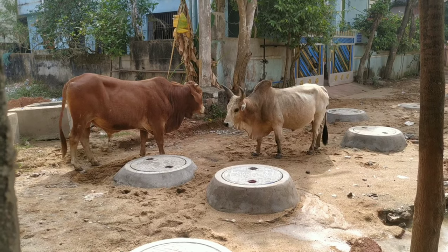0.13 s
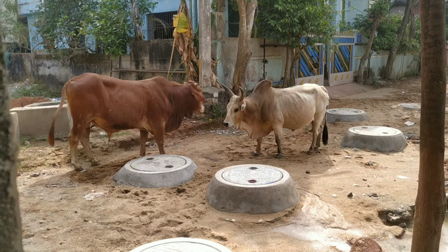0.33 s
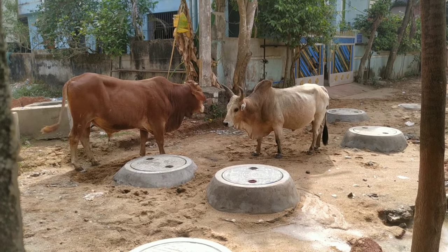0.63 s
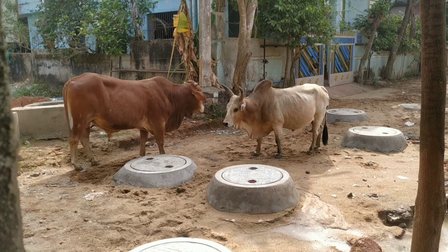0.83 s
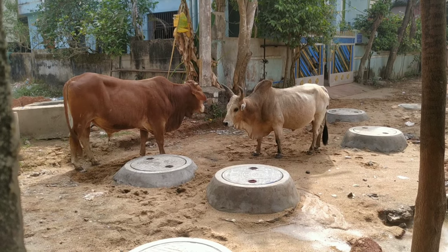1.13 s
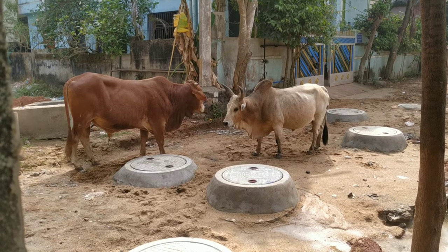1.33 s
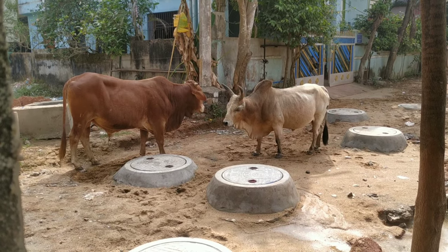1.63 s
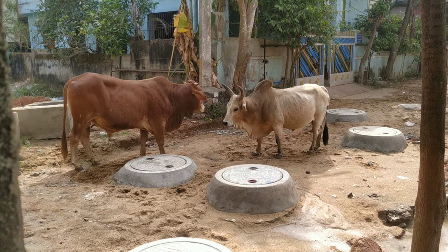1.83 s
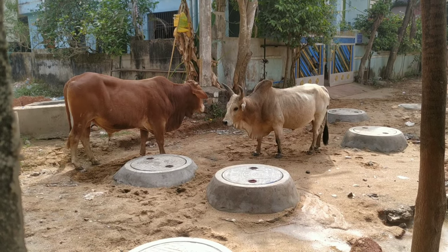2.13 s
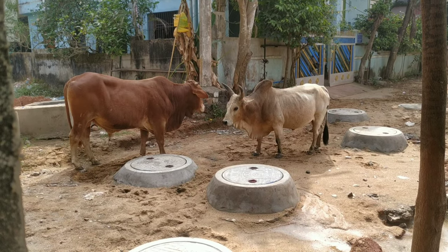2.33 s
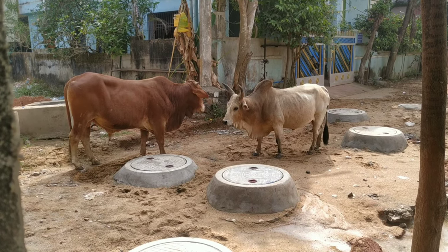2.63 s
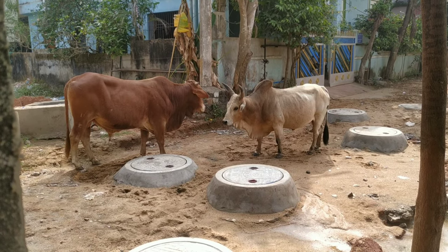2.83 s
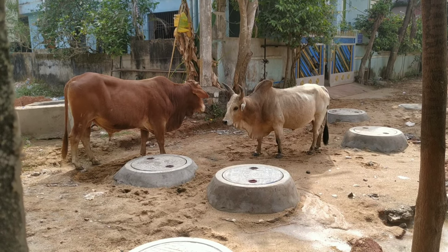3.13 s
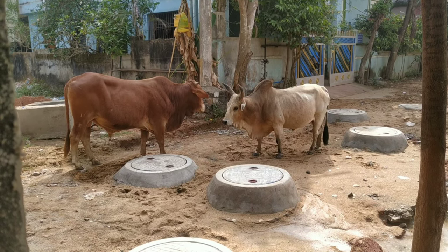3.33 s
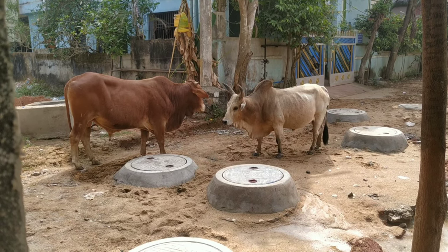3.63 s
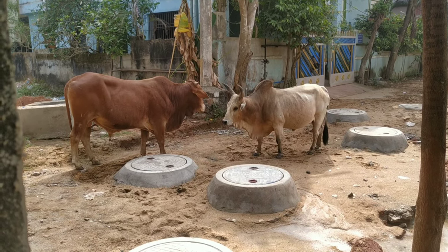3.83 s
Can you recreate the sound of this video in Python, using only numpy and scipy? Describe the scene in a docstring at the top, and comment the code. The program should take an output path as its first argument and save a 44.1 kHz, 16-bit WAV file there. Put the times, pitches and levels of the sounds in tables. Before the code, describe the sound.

A bull's loud, bright bellow cuts off, then after a quiet gap a moan swells into a roar.

```python
"""A bull's bright, open-mouthed bellow breaks off as one bird chirps four times and another gives a falling note.
The gap leaves low outdoor rumble with far birds, a soft knock and faint dry scuffs and ticks.
Then a low moan rises and opens into a roar. Bellows: fold pulses and rasp through throat resonances.
Birds: gliding sines. Knock: a short sine. Air, scuffs and far birds: filtered noise."""
import sys
import numpy as np
from scipy import signal
from scipy.fft import rfft, irfft
from scipy.io import wavfile
from scipy.ndimage import uniform_filter1d

SR = 44100
rng = np.random.default_rng(int(sys.argv[2]) if len(sys.argv) > 2 else 0)


def transcribe(u):
    """Save the signal u as a 16-bit wav file named by the first command-line argument.

    u: samples, shape (n,) or (channels, n), limited to [-1, 1]; the rate is SR.
    q: integer samples, one column per channel.
    """
    v = np.clip(np.atleast_2d(u).T, -1, 1)
    q = np.round(v * 32767).astype(np.int16)
    wavfile.write(sys.argv[1], SR, q)


N = 176400
TIME = np.arange(N) / SR
PADDED = 2 ** 18
FREQS = np.maximum(np.arange(PADDED // 2 + 1) * SR / PADDED, 1)


def from_db(db):
    """Decibels to gain."""
    return 10 ** (np.asarray(db) / 20)


def rms_one(x):
    """Scale to unit power."""
    return x / np.sqrt(np.mean(x ** 2) + 1e-20)


def in_time(rows, start_s=0):
    """Each column of a curve, interpolated at every sample."""
    s, *columns = np.transpose(rows)
    return [np.interp(TIME - start_s, s, column) for column in columns]


def over_hz(points):
    """A table joined by straight lines over log frequency."""
    hz, value = np.transpose(points)
    return np.interp(np.log(FREQS), np.log(hz), value)


def filtered(x, response):
    """Apply a frequency response."""
    return irfft(rfft(x, PADDED) * response)[..., :N]


def bell(hz, log_width):
    """Gaussian band over log frequency."""
    return np.exp(-(np.log(FREQS / hz) / log_width) ** 2)


def flutter(hz):
    """Random motion up to a given rate, spread 1."""
    return rms_one(filtered(rng.standard_normal(N), 1 / (1 + (FREQS / hz) ** 2)))


def gate(rows, attack_s, release_s, start_s=0):
    """Open for the length of a curve, with exponential flanks."""
    early_s = start_s + rows[0][0] - TIME
    late_s = TIME - start_s - rows[-1][0]
    decay = np.maximum(early_s, 0) / attack_s + np.maximum(late_s, 0) / release_s
    return np.exp(-np.minimum(decay, 20))


def diffuse_tail(envelope):
    """Response of a unit-energy noise tail with a given envelope."""
    tail = rng.standard_normal(SR) * envelope
    return rfft(tail / np.sqrt(np.sum(tail ** 2)), PADDED)


# left-right likeness of noise: [f/Hz, likeness 0-1]
LIKENESS = [(300, .97), (9000, .4)]


def stereo_noise(spectrum):
    """Coloured noise, alike in both ears in the bass and less so in the treble."""
    alike = np.clip(over_hz(LIKENESS), 0, 1)
    split = np.sqrt([1 + alike, 1 - alike])
    mid, side = filtered(rng.standard_normal((2, N)), from_db(over_hz(spectrum)) * split)
    return rms_one(np.array([mid + side, mid - side]))


# outdoor air spectrum: [f/Hz, relative density/dB per Hz]
AIR_SPECTRUM = [(25, -1.5), (150, -9), (350, -23.5), (480, -20.5), (1500, -29), (3400, -29.5), (5000, -35),
                (6700, -27.5), (15500, -39)]
AIR_DB = -45.5
FAR_BIRD_HZ, FAR_BIRD_DB, FAR_BIRD_LOG_WIDTH = 3350, -68.5, .05


def air():
    """Steady low rumble under faint hiss; far birds as narrow-band noise, a thin wavering tone."""
    twitter = filtered(rng.standard_normal(N), bell(FAR_BIRD_HZ, FAR_BIRD_LOG_WIDTH)) * flutter(10)
    return from_db(AIR_DB) * stereo_noise(AIR_SPECTRUM) + from_db(FAR_BIRD_DB) * rms_one(twitter)


KNOCK_S, KNOCK_HZ, KNOCK_DB, KNOCK_DECAY_S = 1.7, 460, -51, .022


def knock():
    """One soft, hollow knock far off: a sine that swells and dies symmetrically."""
    envelope = np.exp(-np.abs(TIME - KNOCK_S) / KNOCK_DECAY_S)
    return from_db(KNOCK_DB) * np.sin(2 * np.pi * KNOCK_HZ * TIME) * envelope


# dry scuffs and ticks: [t/s, level/dB]
SCUFFS = [(1.02, -49), (1.179, -42), (1.519, -43), (2.405, -43.5), (2.849, -42)]
# scuff spectrum: [f/Hz, relative level/dB]
SCUFF_SPECTRUM = [(1000, -23), (2500, -6), (9000, -3.5), (15500, -6.5)]
SCUFF_ATTACK_S, SCUFF_DECAY_S, GRIT_DB = 0.037, 0.1, 1.5


def scuffs():
    """Short gritty swells of dry noise."""
    level = np.zeros(N)
    for s, db in SCUFFS:
        attack = np.clip((TIME - s) / SCUFF_ATTACK_S + .5, 0, 1)
        decay = np.exp(-np.maximum(TIME - s, 0) / SCUFF_DECAY_S)
        level += from_db(db) * attack * decay
    return level * rms_one(stereo_noise(SCUFF_SPECTRUM) * from_db(GRIT_DB * flutter(200)))


def whistle(shape, start_s=0):
    """A bird's nearly pure gliding tone."""
    hz, db = in_time(shape, start_s)
    tone = np.sin(2 * np.pi * np.cumsum(hz) / SR)
    return from_db(db) * tone * gate(shape, .002, 0.0019, start_s)


# chirp peaks: [t/s, relative level/dB]
CHIRPS = [(.045, -5.5), (.199, -5), (0.354, -2), (.511, -4)]
# one chirp, soft arch then loud upward sweep: [t from peak/s, f/Hz, relative level/dB]
CHIRP = [(-.072, 1560, -15), (-.051, 1870, -2), (-.036, 1560, -24), (-.024, 1600, -20), (-.012, 1980, -4),
         (0, 2530, 1), (.018, 2480, -7)]
# the other bird's falling note: [t/s, f/Hz, level before warble/dB]
FALLING_NOTE = [(.63, 3780, -21.5), (.662, 3423, -15), (.694, 3193, -15), (.725, 3380, -28.5)]
WARBLE_HZ, WARBLE_DEPTH = 60.2, 0.92
ECHO_S, ECHO_DB = 0.029, -11


def birds():
    """Four chirps and a fall warbling in level, thrown back by a wall."""
    song = sum(from_db(db) * whistle(CHIRP, s) for s, db in CHIRPS)
    warble = np.cos(2 * np.pi * WARBLE_HZ * (TIME - FALLING_NOTE[1][0]))
    song = song + whistle(FALLING_NOTE) * (1 + WARBLE_DEPTH * warble)
    return song + from_db(ECHO_DB) * np.interp(TIME - ECHO_S, TIME, song, left=0)


YARD_T60_S, BIRD_YARD_DB, BULL_YARD_DB = 1, -32.5, -23


def yard(x):
    """A weak diffuse tail from walls and trees: noise falling 60 dB per T60."""
    return filtered(x, diffuse_tail(from_db(-60 * TIME[:SR] / YARD_T60_S)))


TREBLE_HZ = 1700


def treble(x):
    """The upper part of a sound."""
    return filtered(x, 1 / (1 + (TREBLE_HZ / FREQS) ** 6))


RESONANCE_LOG_WIDTH = 0.13


def swell(x, hz, db):
    """Raise or lower one resonance of the voice by a level that moves in time."""
    return x + filtered(x, bell(hz, RESONANCE_LOG_WIDTH)) * (from_db(db) - 1)


# resonances that ring on between pulses: [f/Hz]
RINGING_HZ = [650, 1000, 2200, 2750]
RINGING_WIDTH_HZ = 200
SCATTER_S, SCATTER_DB = 0.0075, 6


def ring_on(x):
    """Resonances hold their partials back (all-pass); nearby surfaces scatter the treble."""
    lag = 1
    for hz in RINGING_HZ:
        detuning = hz ** 2 - FREQS ** 2
        damping = 1j * FREQS * RINGING_WIDTH_HZ
        lag = lag * (detuning - damping) / (detuning + damping)
    share = from_db(SCATTER_DB) / (1 + (TREBLE_HZ / FREQS) ** 4)
    scatter = 1 + share * diffuse_tail(np.exp(-TIME[:SR] / SCATTER_S))
    return filtered(x, lag * scatter / np.sqrt(1 + share ** 2))


WANDER, WANDER_HZ = .18, 7


def wander(x):
    """A scattered copy comes and goes, so partials rise and fall by differing amounts."""
    scattered = filtered(x, diffuse_tail(np.exp(-TIME[:SR] / SCATTER_S)))
    return x + WANDER * flutter(WANDER_HZ) * scattered


JITTER_CYCLES, SHIMMER, RASP, RASP_DULLING = .025, .55, 1.15, .55  # all scale with roughness but dulling
HISS_DB = -18


def folds(curve, roughness):
    """Vocal-fold pulses, uneven when hoarse, with a puff of rasp in every cycle."""
    hz, rough = in_time(curve)[0], in_time(roughness)[0]
    cycle = (np.cumsum(hz) / SR + JITTER_CYCLES * rough * flutter(60)) % 1 - .5
    offset = cycle * SR / hz  # samples from the pulse
    pulses = rms_one(np.sinc(offset / 2) * np.exp(-(offset / 10) ** 2))
    pulses = pulses * (1 + SHIMMER * rough * flutter(70))
    rasp = rms_one(rng.standard_normal(N) * np.exp(-2 * (cycle % 1)))
    bright = treble(rasp)
    breath = RASP * rough * (rasp - RASP_DULLING * bright) + from_db(HISS_DB) * bright
    return wander(ring_on(pulses + breath))


def throat(shape, top_hz):
    """Causal minimum-phase response of a posture, dark below the voice and above its top."""
    low_cut_db = 10 * np.log10(1 + (130 / FREQS) ** 4)
    top_cut_db = np.minimum(10 * np.log10(1 + (FREQS / top_hz) ** 70), 60)
    cepstrum = irfft(np.log(from_db(over_hz(shape) - low_cut_db - top_cut_db)))
    cepstrum[1:PADDED // 2] *= 2
    cepstrum[PADDED // 2 + 1:] = 0
    return np.exp(rfft(cepstrum))


ATTACK_S, RELEASE_S = 0.01, 0.0049


def bellow(source, curve, postures, changes, top_hz):
    """The source rings the throat, which passes from posture to posture."""
    shapes = [rms_one(filtered(source, throat(shape, top_hz))) for shape in postures]
    voice = shapes[0]
    for (s, length_s), shape in zip(changes, shapes[1:]):
        share = np.clip((TIME - s) / length_s + .5, 0, 1)
        voice = voice * (1 - share) + shape * share
    # flatten the running power, then impose the level curve
    voice = voice / np.sqrt(uniform_filter1d(voice ** 2, size=1800) + 1e-9)
    return voice * from_db(in_time(curve)[1]) * gate(curve, ATTACK_S, RELEASE_S)


# first bellow: [t/s, f/Hz, relative level/dB]
FIRST_BELLOW = [(0, 152.2, -18.5), (0.102, 159.2, -15.5), (.27, 157.8, -13.5), (.33, 163.3, -13),
                (0.431, 166, -14), (.52, 163, -14.5), (0.682, 155.2, -19), (0.726, 145.6, -27)]
# its hoarseness: [t/s, roughness 0-1]
FIRST_ROUGH = [(.11, .13), (.2, .42), (.3, .17), (.53, .22), (.58, .08), (.72, .33)]
# open-mouthed throat resonances: [f/Hz, relative level/dB]
WIDE = [(160, -26), (320, -11.5), (480, -16.5), (650, -3), (800, -17.5), (970, 0.5), (1140, -6.5),
        (1300, -13), (1500, -17), (1720, -8.5), (1870, -6.5), (2170, -5.5), (2580, -15), (2750, -5.5),
        (2950, -13.5), (3350, -20.5), (3850, -28), (4500, -25), (5300, -28.5), (8500, -38)]
# change of its low resonance: [t/s, level/dB]
LOW_RESONANCE = [(.06, 9), (.11, -8), (.26, -9.5), (.37, 3)]
# its strain: [t/s, strain 0-1]
STRAIN = [(.2, 0), (.42, 0.82), (.72, 0.46)]
# resonances lifted by strain: [f/Hz]
STRAINED_HZ = [1500, 4550]
FIRST_TOP_HZ, LOW_RESONANCE_HZ = 8240, 670
STRAIN_DB = 8  # at strain 1
DULLING_DB_PER_DB = 0.61  # treble loss per dB of effort below the median


def first_bellow():
    """Wide-open call: strain lifts two resonances, falling effort dulls the treble."""
    source = folds(FIRST_BELLOW, FIRST_ROUGH)
    voice = bellow(source, FIRST_BELLOW, [WIDE], [], FIRST_TOP_HZ)
    effort_db = in_time(FIRST_BELLOW)[1] - np.median(np.array(FIRST_BELLOW)[:, 2])
    voice = voice + treble(voice) * (from_db(DULLING_DB_PER_DB * np.minimum(effort_db, 0)) - 1)
    voice = swell(voice, LOW_RESONANCE_HZ, in_time(LOW_RESONANCE)[0])
    for hz in STRAINED_HZ:
        voice = swell(voice, hz, STRAIN_DB * in_time(STRAIN)[0])
    return voice


HUM_HZ = 60


def hum():
    """Low unit-power sine under the first bellow."""
    return np.sqrt(2) * np.sin(2 * np.pi * HUM_HZ * TIME) * gate(FIRST_BELLOW, ATTACK_S, RELEASE_S)


SECOND_TOP_HZ = 4190
# resonance that sinks as the mouth opens: [t/s, f/Hz, relative level/dB]
SINKING = [(3.09, 2400, -43), (3.3, 1960, -35), (3.48, 1660, -36)]
SINKING_WIDTH_HZ = 130


def sinking_resonance(source):
    """One narrow resonance glides down through the start of the moan."""
    hz, db = in_time(SINKING)
    turn = np.exp(2j * np.pi * np.cumsum(hz) / SR)
    # shift the resonance to 0 Hz, ring a one-pole there, shift back
    pole = np.exp(-np.pi * SINKING_WIDTH_HZ / SR)
    rung = turn * signal.lfilter([1], [1, -pole], source / turn)
    voice = rms_one(filtered(rung.real, FREQS < SECOND_TOP_HZ))
    return voice * from_db(db) * gate(SINKING, ATTACK_S, ATTACK_S)


# chest band edges: [f/Hz]
CHEST_BAND_HZ = [165, 345]
CHEST_REL_DB = -30


def chest(source):
    """Coarse growl: the low band of the voice with random level flutter."""
    band = signal.butter(2, CHEST_BAND_HZ, "band", fs=SR, output="sos")
    low = signal.sosfilt(band, source * (1 + .5 * flutter(90)))
    return from_db(CHEST_REL_DB) * rms_one(low)


# second bellow: [t/s, f/Hz, relative level/dB]
SECOND_BELLOW = [(3.027, 96.94, -49), (3.171, 113, -28), (3.261, 127, -28.5), (3.396, 146.7, -22),
                 (3.488, 156.1, -17.5), (3.564, 157.4, -18.5), (3.717, 172.2, -15), (3.802, 174.5, -12.5),
                 (3.854, 186.9, -14), (4, 185.4, -10.5)]
# its hoarseness: [t/s, roughness 0-1]
SECOND_ROUGH = [(3.15, .32), (3.35, .18), (3.64, .22), (3.695, .55), (3.745, .2), (3.815, .2), (3.845, .48)]
# throat and mouth resonances per posture: [f/Hz, relative level/dB]
MOAN = [(150, -24.5), (200, -5), (280, -3), (380, -28.5), (560, -4), (730, -22), (930, 3.5), (1080, -9),
        (1240, 7.5), (1400, -9.5), (1900, -20), (2200, -4), (2750, -10.5), (3150, -24), (4300, -31)]
HALF_OPEN = [(155, -19), (310, -2.5), (470, -14), (630, -4.5), (780, -13), (945, -3), (1250, -1.5),
             (1400, -11), (1570, -7.5), (1900, -13.5), (2220, -3), (2480, -17.5), (3150, -21.5),
             (3480, -18.5), (4300, -24.5)]
ROAR = [(180, -18.5), (300, -22), (550, -2.5), (730, -13), (900, 5), (1060, -3), (1215, 3), (1360, -18.5),
        (1540, -8.5), (1800, -22.5), (2150, -16.5), (3100, -29), (3450, -25.5), (4300, -34.5)]
# passage to the next posture: [t of midpoint/s, length/s]
SECOND_CHANGES = [(3.389, 0.36), (3.691, 0.11)]
CHEST_S, CHEST_ATTACK_S = 3.835, .02
CHEST_RASP_HZ, CHEST_RASP_DB = 1840, 6


def second_bellow():
    """Moan opening to roar, which breaks into a rough chest voice."""
    source = folds(SECOND_BELLOW, SECOND_ROUGH)
    voice = bellow(source, SECOND_BELLOW, [MOAN, HALF_OPEN, ROAR], SECOND_CHANGES, SECOND_TOP_HZ)
    broken = np.clip((TIME - CHEST_S) / CHEST_ATTACK_S, 0, 1)
    voice = swell(voice, CHEST_RASP_HZ, CHEST_RASP_DB * broken)
    return voice + sinking_resonance(source) + broken * chest(source)


FIRST_DB, SECOND_DB, HUM_DB = 3, 0.5, -43.5


def bull():
    """Both bellows and the hum at their gains."""
    voice = from_db(FIRST_DB) * first_bellow() + from_db(SECOND_DB) * second_bellow()
    return voice + from_db(HUM_DB) * hum()


def scene():
    """Animals and knock straight ahead, air and scuffs wide; the yard returns the bull's treble and the song."""
    voice, song = bull(), birds()
    returned = yard(from_db(BULL_YARD_DB) * treble(voice) + from_db(BIRD_YARD_DB) * song)
    return air() + knock() + scuffs() + returned + song + voice


OVERLOAD, CUTOFF_HZ = .97, 15800


def record(dry):
    """The loudest peaks are flattened and the top is cut."""
    clipped = np.clip(dry, -OVERLOAD, OVERLOAD)
    return filtered(clipped, 1 / np.sqrt(1 + (FREQS / CUTOFF_HZ) ** 200))


dry = scene()
out = record(dry)
transcribe(out)
```